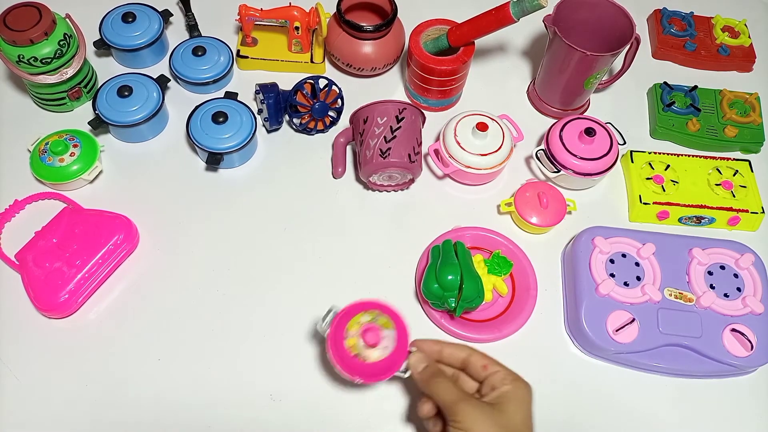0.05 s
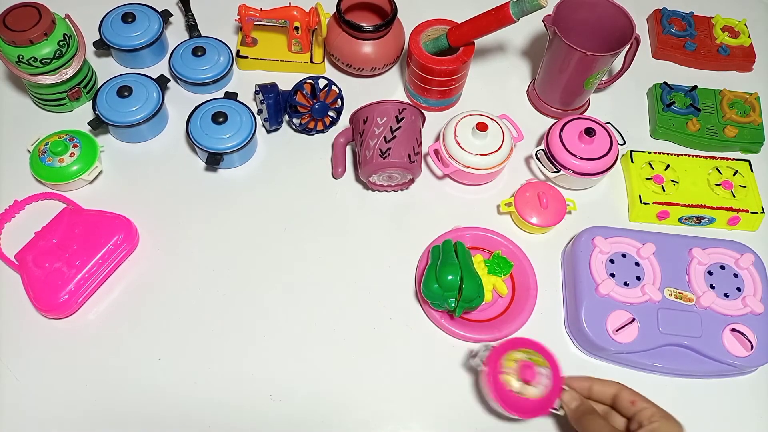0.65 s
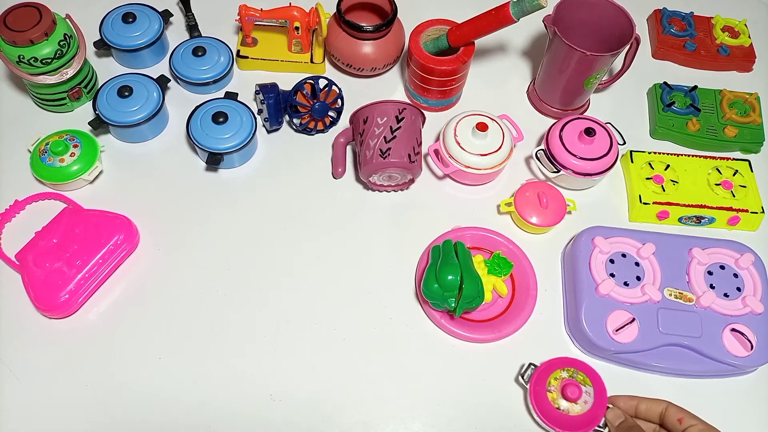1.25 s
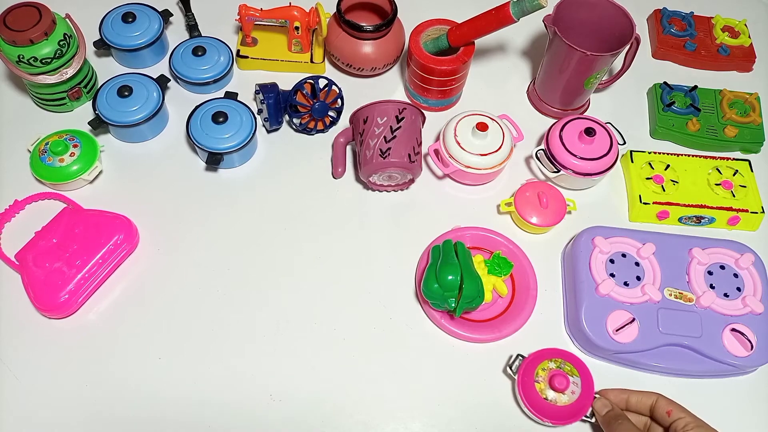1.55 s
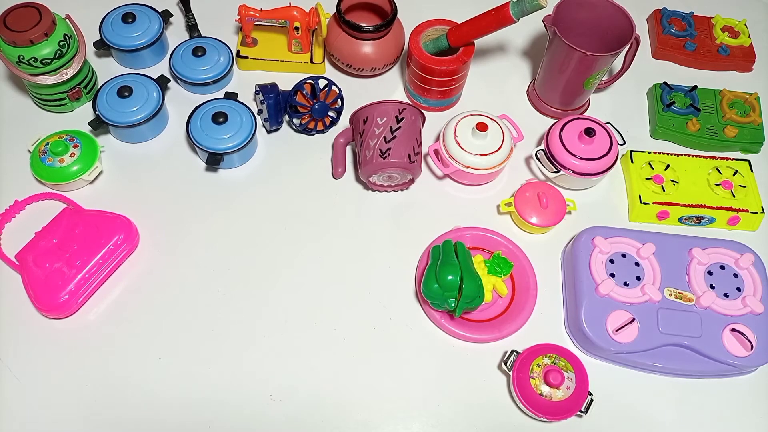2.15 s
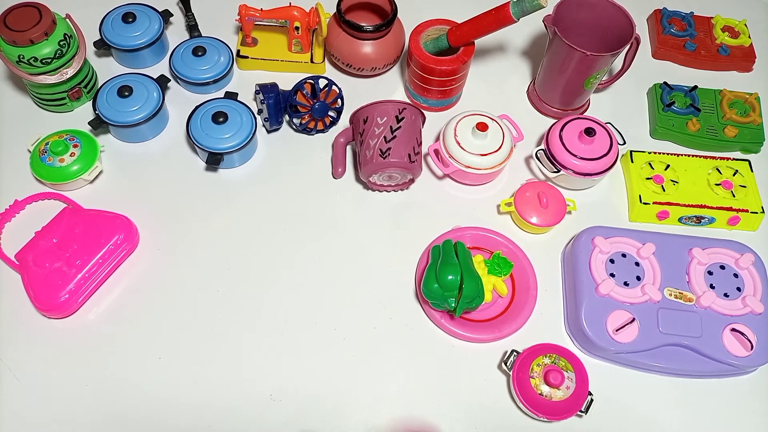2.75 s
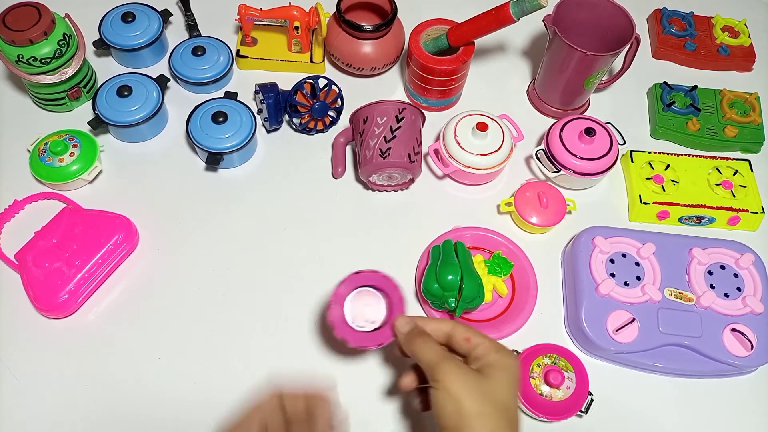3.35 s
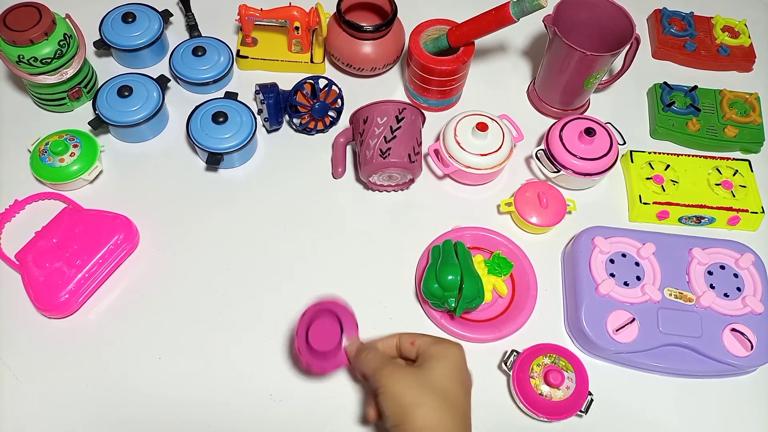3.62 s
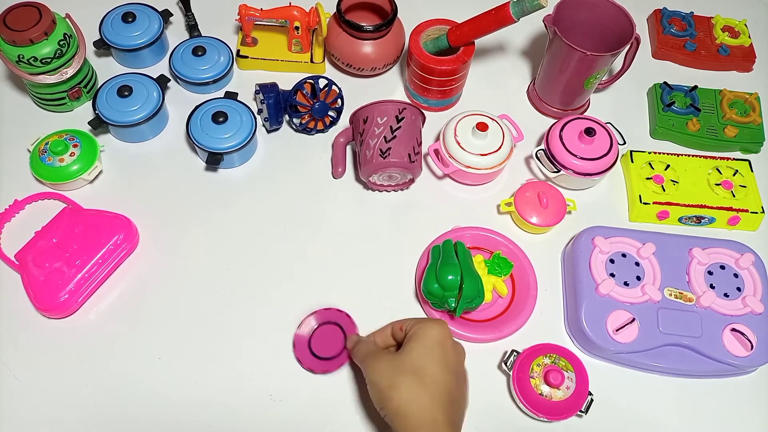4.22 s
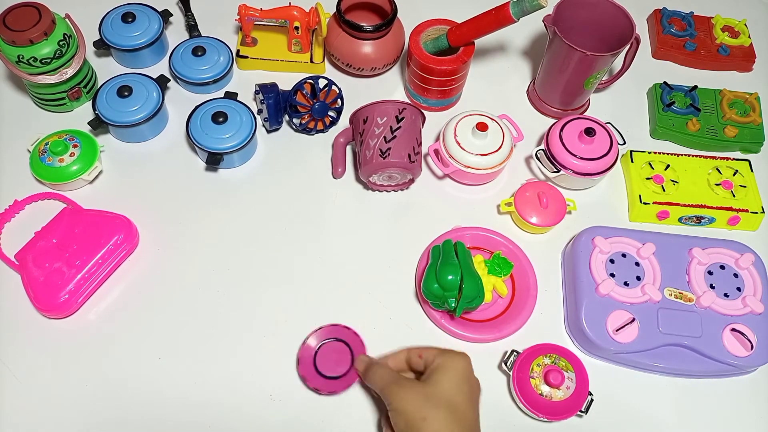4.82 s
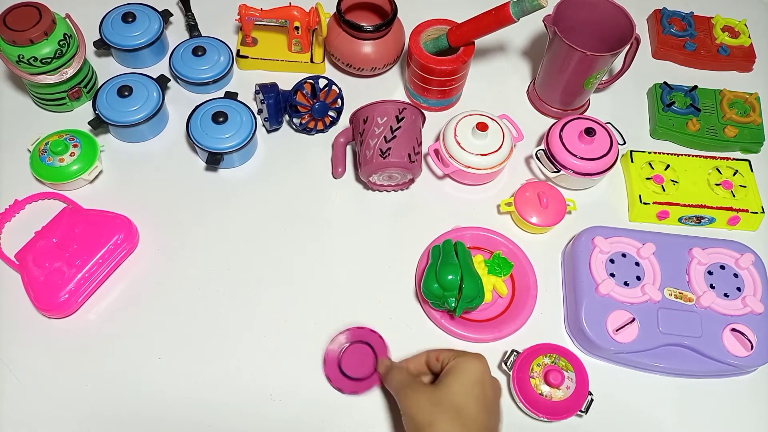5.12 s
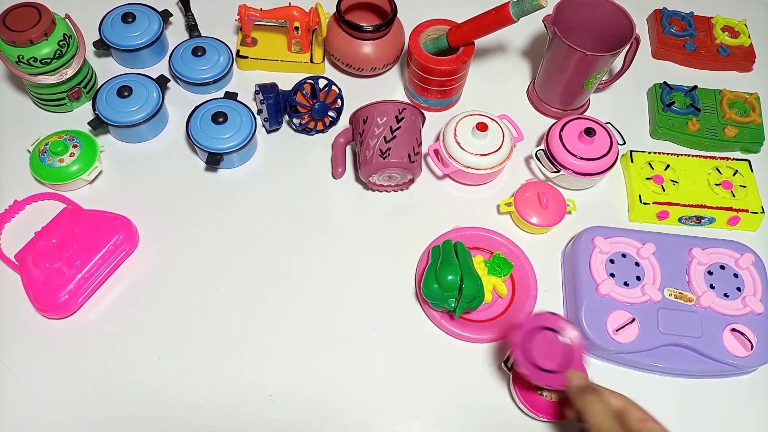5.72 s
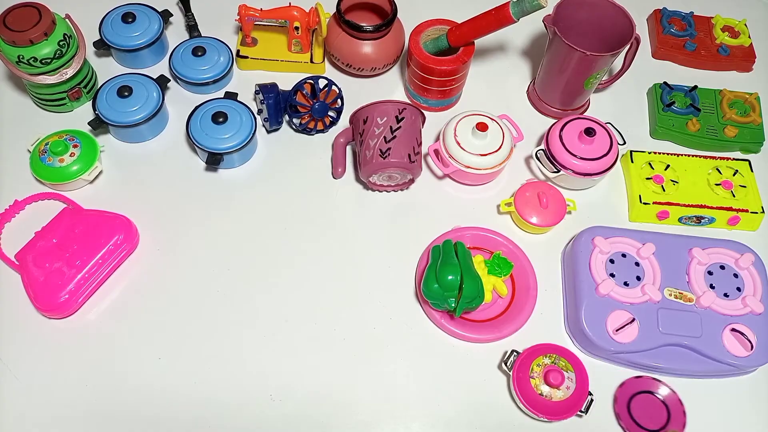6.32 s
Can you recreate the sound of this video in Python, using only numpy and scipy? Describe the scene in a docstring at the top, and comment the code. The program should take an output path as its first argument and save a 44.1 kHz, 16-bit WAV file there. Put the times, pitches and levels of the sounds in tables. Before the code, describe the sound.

Close, sharp plastic taps sound on a table in a small, slightly echoing room. First a toy pot bounces along for about a second, its lid jolting. A gap follows with a very faint squeak, then a small toy dish lands again and again in a longer, uneven series, with light rim ticks at the end. Moving air bumps the nearby microphone with low rumbling puffs all along, above a soft hiss.

```python
"""A lidded toy pot hops across a tabletop in a small hard room; later a small plastic dish does the same.
Each tap is a sharp tick with short shell resonances; a limiter holds it down and lets the room swell
after it. The pot skids once on its rim; plastic squeaks faintly and the dish's rim ticks lightly.
Throughout, a draught buffets the nearby microphone in dull gusts and puffs, over a faint hiss."""
import sys
import numpy as np
from scipy import signal
from scipy.fft import rfft, irfft
from scipy.io import wavfile
from scipy.ndimage import uniform_filter1d, minimum_filter1d

SR = 44100
rng = np.random.default_rng(int(sys.argv[2]) if len(sys.argv) > 2 else 0)


def generate_wav(sig):
    """Save sig (samples, or channels by samples) to the path in sys.argv[1] as 16-bit PCM at SR."""
    pcm = np.round(np.clip(np.atleast_2d(sig).T, -1, 1) * 32767).astype(np.int16)
    wavfile.write(sys.argv[1], SR, pcm)


N = 285321


def amp(db):
    """Amplitude ratio from dB."""
    return 10 ** (np.asarray(db) / 20)


def unit_rms(x):
    """Scales to rms 1."""
    return x / np.sqrt(np.mean(x ** 2) + 1e-20)


def log_interp(points, hz):
    """Joins (f/Hz, value) points on a log-frequency axis."""
    f, value = np.transpose(points)
    return np.interp(np.log(hz + 1), np.log(f + 1), value)


def add(mix, start_s, sound):
    """Mixes a sound in; it may begin before zero."""
    start = round(start_s * SR)
    sound = sound[max(-start, 0):]
    part = mix[max(start, 0):][:len(sound)]
    part += sound[:len(part)]


def bells_db(modes, hz):
    """Bell-shaped peak or dip around each mode."""
    return sum(db / (1 + (2 * (hz - f) / width) ** 2) for f, width, db in modes)


def noise(colour):
    """Noise of rms 1 with the given spectrum."""
    gain = amp(log_interp(colour, np.fft.rfftfreq(N, 1 / SR)))
    return unit_rms(irfft(rfft(rng.standard_normal(N)) * gain, N))


def min_phase(db):
    """Minimum-phase impulse response of a spectrum."""
    log_gain = np.log(amp(np.r_[db, db[-2:0:-1]]))
    return np.fft.ifft(np.exp(np.conj(signal.hilbert(log_gain)))).real[:len(db)]


def shell_blow(colour, modes, tilt_db_oct, knock_db=0, size=4096):
    """One blow on a shell; each contact point weights the resonances differently."""
    hz = np.fft.rfftfreq(size, 1 / SR)
    contact = np.transpose([np.geomspace(600, 16000, 70), 1.3 * np.r_[0, rng.standard_normal(69)]])
    shell_db = np.maximum(log_interp(colour, hz), -70) + bells_db(modes, hz)
    tilt_db = tilt_db_oct * np.log2(np.clip(hz, 200, 7000) / 1500)
    table_db = bells_db([(459, 470, knock_db)], hz)  # a flat landing also knocks the tabletop
    blow = min_phase(shell_db + tilt_db + table_db + log_interp(contact, hz))
    return blow / abs(min_phase(shell_db)).max()


def ringing(modes, grip_detune=0.0121, size=16384):
    """Slowly dying modes, energy 1; each blow shares its force differently and the grip bends the pitch."""
    hz, db, t60_s = np.transpose(modes)[:, :, None]
    t = np.arange(size) / SR
    share, bend = rng.standard_normal((2,) + hz.shape)
    envelopes = amp(db + 3 * share - 60 * t / t60_s)
    tones = (envelopes * np.sin(2 * np.pi * hz * (1 + grip_detune * bend) * t)).sum(0)
    return tones / np.linalg.norm(tones)


# room decay: f/Hz, T60/s
ROOM_T60 = [(300, 0.25), (800, 0.39), (2100, 0.36), (5500, 0.37), (14600, 0.39)]
# standing waves: f/Hz, width/Hz, gain/dB
ROOM_MODES = [(468.4, 42, 8), (573, 8.7, -3.5), (723, 5.7, 2), (759, 15, -2), (904.6, 125, 7.5),
              (1394, 45, 8.5), (1740, 20, -3.5), (1957, 154, 6.5), (3170, 29, -0.5), (3140, 35, 9),
              (3390, 130, 1), (4730, 40, -43)]
def room_tail(build_s=0.0044, hold_s=0.11, steepness=3, floor_db=-17, size=16384):
    """Dense room reflections, energy 1; noise suppression cuts them to a faint tail after about 0.1 s."""
    hz, frame_s, spectra = signal.stft(rng.standard_normal(size), SR, nperseg=256)
    decay = amp(-60 * frame_s / log_interp(ROOM_T60, hz)[:, None])
    tail = signal.istft(spectra * decay, SR, nperseg=256)[1]
    t = np.arange(len(tail)) / SR
    build = 1 - np.exp(-(t / build_s) ** 2)
    suppression = np.maximum(np.exp(-(t / hold_s) ** steepness), amp(floor_db))
    standing_waves = min_phase(bells_db(ROOM_MODES, np.fft.rfftfreq(size, 1 / SR)))
    tail = signal.fftconvolve(tail * build * suppression, standing_waves)[:size]
    return tail / np.linalg.norm(tail)


def clutter(level_db=-7, size=200):
    """Close reflections off toys standing around make each tap hollow in its own way."""
    scatter = rng.standard_normal(size) * signal.windows.tukey(size, .5)
    return amp(level_db) * scatter / np.linalg.norm(scatter)


# first echoes off table and walls: delay/s, level/dB
ECHOES = [(.0017, -8.5), (.0032, -11.5), (.0117, -15.5), (.0148, -25), (0.025, -22), (0.034, -27.5)]
def in_room(sound, room_db, echo_db, echo_cutoff_hz=4000):
    """Direct sound, close scatter, duller echoes and a tail that differs at each place on the table."""
    path = amp(room_db) * room_tail()
    echoes = np.zeros(SR // 20)
    for delay_s, db in ECHOES:
        echoes[round(delay_s * SR)] += amp(db + echo_db)
    add(path, 0, signal.lfilter(*signal.butter(1, echo_cutoff_hz, fs=SR), echoes))
    add(path, 0, clutter())
    path[0] += 1  # direct sound
    return signal.fftconvolve(sound, path)


def taps(rows, colour, modes, long_modes, ring_db, echo_db, accent_width_hz=600):
    """A toy knocks on the table; where it lands favours or damps one resonance, the accent."""
    out = np.zeros(N)
    for start_s, db, tilt_db_oct, knock_db, accent_hz, accent_db, room_db in rows:
        accent = (accent_hz, accent_width_hz, accent_db)
        blow = amp(db) * shell_blow(colour, [*modes, accent], tilt_db_oct, knock_db)
        add(out, start_s, in_room(blow, room_db, echo_db))
        add(out, start_s, amp(ring_db) * np.linalg.norm(blow) * ringing(long_modes))
    return out


# taps and lid jolts: t/s, level/dB, tilt/(dB/oct), knock/dB, accent f/Hz, accent gain/dB, room/dB
POT_TAPS = [(-.022, 0.5, 2, 7.5, 1210, 3, -6.5), (.0770, 3, 0.9, 4.5, 4600, 5, -6.5),
            (.3405, -7.5, -8, -30, 1170, -5, 3), (.5211, 3, 2.5, 11.5, 1490, 1.5, -6),
            (.5630, -10.5, -6.5, -13.5, 2430, 5, -2), (.7206, 3, 0.8, 6, 2130, -0.5, -9),
            (.8619, 6.5, 2, 12, 6330, 5.5, -7.5), (.8878, -6.5, 1, 14, 1140, 2, -7),
            (1.1776, 3.5, 2, 11.5, 3900, 3, -5.5), (1.1830, -11, -4, 6.5, 570, -12, 3.5)]
# broad tap spectrum: f/Hz, density/dB
POT_COLOUR = [(120, -67), (200, -6), (394, -2.5), (456, -3.5), (763, 1), (836, 0), (1140, 5), (1370, -9),
              (1560, -3.5), (2800, -10.5), (3760, -11.5), (8270, -42), (14900, -54.5), (16000, -30.5)]
# shell resonances: f/Hz, width/Hz, gain/dB
POT_MODES = [(357, 52, 4), (433, 31, 3), (564, 93, 4), (745, 56, 7.5), (1147, 56, 3), (1530, 230, 5.5),
             (2460, 590, 4.5), (3710, 190, 4.5), (4370, 180, 6), (6610, 1500, 8), (8800, 1500, -8)]
# faint long modes: f/Hz, level/dB, T60/s
POT_RING = [(436, 7, 0.3), (757, 1.5, 0.25), (918, 5, 0.39), (1064, 2.5, 0.34), (1470, -2, 0.33),
            (2230, -3, 0.33), (4730, -12.5, 0.24)]
def pot():
    """The pot lands and its lid jolts, ringing the shell."""
    return taps(POT_TAPS, POT_COLOUR, POT_MODES, POT_RING, ring_db=-16.5, echo_db=3)


def turbulence(colour, window=1100):
    """Low rumble of air, its strength evened out from moment to moment."""
    air = noise(colour)
    return air / np.sqrt(uniform_filter1d(air ** 2, window) + 0.11)


# gusts across the microphone: t/s, length/s, level/dB
GUSTS = [(0.0, 0.2, -33), (0.218, 0.19, -39), (0.643, .19, -31.5), (0.939, 0.21, -44.5),
         (1.255, 0.15, -31.5), (1.514, .04, -44), (1.678, 0.024, -36.5), (2.055, 0.25, -36.5),
         (2.293, 0.033, -20.5), (2.366, 0.031, -27), (2.47, 0.084, -29.5), (2.681, 0.16, -28),
         (2.914, 0.068, -37), (3.181, .12, -36), (3.44, 0.16, -41.5), (3.603, 0.043, -27),
         (3.8, 0.071, -33), (4.144, .028, -37.5), (4.382, 0.17, -37.5), (5.71, 0.093, -35.5),
         (5.94, 0.23, -40), (6.009, 0.03, -27.5), (6.149, 0.1, -24), (6.371, 0.026, -36)]
# slow eddies: f/Hz, density/dB
SLOW_AIR_COLOUR = [(15, -46.5), (25, -32.5), (65, 11), (123, 4), (188, -10.5), (271, -14), (362, -40),
                   (450, -22.5), (580, -61.5), (990, -120)]
# fast eddies: f/Hz, density/dB
FAST_AIR_COLOUR = [(25, -25.5), (80, 2), (190, 1.5), (290, -7.5), (400, -32), (600, -84.5)]
def draught(rise_s=.024, fall_tau_s=0.0091, wake_db=-21, wake_tau_s=.07, fast_db=-27.5, spread_db=2.5):
    """Each gust rises, holds and dies into a faint wake; faster air makes smaller, brighter eddies."""
    strength, t = np.zeros(N), np.arange(SR) / SR
    for start_s, length_s, db in GUSTS:
        after_s = np.maximum(t - length_s, 0)
        fall = np.maximum(np.exp(-after_s / fall_tau_s), amp(wake_db) * np.exp(-after_s / wake_tau_s))
        add(strength, start_s, amp(db) * np.minimum(t / rise_s, 1) * fall)
    strength_db = 20 * np.log10(strength + 1e-9)
    fast_share = .5 + .5 * np.tanh((strength_db - fast_db) / (2 * spread_db))
    slow_air = np.sqrt(1 - fast_share) * turbulence(SLOW_AIR_COLOUR)
    fast_air = np.sqrt(fast_share) * turbulence(FAST_AIR_COLOUR)
    return strength * (slow_air + fast_air)


# background spectrum: f/Hz, density/dB
HISS_COLOUR = [(35, -31.5), (60, 4.5), (118, 8), (146, -11.5), (338, -6), (448, -7.5), (682, -12),
               (842, -5.5), (1140, -13), (1250, -7.5), (2090, -12.5), (2900, -14.5), (3120, -14),
               (8120, -45.5), (16000, -55.5)]
def hiss(level_db=-55):
    """Faint, steady noise."""
    return amp(level_db) * noise(HISS_COLOUR)


# single strong eddies: t/s, level/dB, f/Hz
PUFFS = [(0.277, -18, 94), (0.634, -18.5, 89), (.689, -10.5, 165), (.741, -16, 150), (0.771, -11, 123),
         (1.294, -11, 148), (2.204, -12.5, 147), (2.529, -15.5, 109), (2.838, -20.5, 117),
         (3.239, -15.5, 151), (3.521, -23.5, 157), (3.623, -14.5, 152.5), (3.805, -9.5, 143),
         (4.018, -20, 88.6), (4.486, -21, 167), (5.727, -16.5, 106), (5.76, -19, 109), (6.163, -15.5, 93),
         (6.229, -11, 115)]
def puffs(sigma_cycles=0.36):
    """Each eddy pushes and pulls the diaphragm for a cycle or two; big, slow ones last longer."""
    out, t = np.zeros(N), np.arange(-2048, 2048) / SR
    for (centre_s, db, hz), phase in zip(PUFFS, rng.random(len(PUFFS))):
        envelope = amp(db) * np.exp(-(hz * t / sigma_cycles) ** 2 / 2)
        add(out, centre_s + t[0], envelope * np.cos(2 * np.pi * (hz * t + phase)))
    return out


# skid envelope: t/s, level/dB
SKID = [(.309, -64), (.318, -16.5), (.341, -41), (.350, -24), (.372, -49)]
def skid(slips_per_s=1500, tilt_db_oct=-2.9):
    """Many tiny slips of the rim ring the pot."""
    t = np.arange(N) / SR
    times_s, levels_db = np.transpose(SKID)
    sliding = (t > times_s[0]) & (t < times_s[-1])
    envelope = amp(np.interp(t, times_s, levels_db)) * sliding
    slips = rng.standard_normal(N) * (rng.random(N) < slips_per_s / SR)
    scrape = unit_rms(signal.oaconvolve(slips, shell_blow(POT_COLOUR, POT_MODES, tilt_db_oct))[:N])
    return in_room(scrape * envelope, room_db=-0.5, echo_db=-29)[:N]


# rubbing spectrum: f/Hz, density/dB
SQUEAK_COLOUR = [(2500, -20), (3900, -11), (4500, -1), (5100, -20), (5850, 2), (6700, -15), (9000, -31),
                 (15000, -48)]
def squeak(start_s=2.696, length_s=.034, level_db=-57):
    """Plastic rubs briefly against plastic."""
    out = np.zeros(N)
    rub = noise(SQUEAK_COLOUR)[:round(length_s * SR)]
    add(out, start_s, amp(level_db) * rub * np.hanning(len(rub)))
    return out


# rim touches: t/s, level/dB, accent f/Hz, accent gain/dB, tilt/(dB/oct)
RIM_TICKS = [(3.6367, -13.5, 4600, 11, 0), (6.3725, -19.5, 3750, 21, -3.5), (6.390, -25, 2490, 11, -5.5)]
# rim resonances: f/Hz, width/Hz, gain/dB
RIM_MODES = [(764, 225, 17.5), (1200, 790, -3.5), (1830, 130, 11.5), (2740, 400, 5.5), (4000, 500, -2)]
# broad spectrum of dish ticks and taps: f/Hz, density/dB
DISH_COLOUR = [(150, -18.5), (250, -59), (296, -7.5), (436, 0), (600, -7.5), (664, -5), (1160, 1),
               (1470, 1.5), (1920, -1.5), (2090, 3), (4380, -0.5), (5540, -12), (7020, -15.5), (8170, -33),
               (14000, -27.5)]
def rim_ticks(accent_width_hz=600):
    """Light touches ring mainly one high resonance of the dish's rim."""
    out = np.zeros(N)
    for start_s, db, accent_hz, accent_db, tilt_db_oct in RIM_TICKS:
        accent = (accent_hz, accent_width_hz, accent_db)
        tick = shell_blow(DISH_COLOUR, [*RIM_MODES, accent], tilt_db_oct)
        add(out, start_s, amp(db) * in_room(tick, room_db=-10.5, echo_db=2))
    return out


# dish taps: t/s, level/dB, tilt/(dB/oct), knock/dB, accent f/Hz, accent gain/dB, room/dB
DISH_TAPS = [(3.8249, 2, 0.62, 0.5, 3380, -12.5, -8.5), (3.9741, -2, -1.3, -6, 4140, -2, -2),
             (4.1278, -4.5, -0.65, -6.5, 2580, 0, -2.5), (4.3657, 4.5, -1.1, -6, 2800, 3.5, -4.5),
             (4.5788, 6, 1, 0, 3650, 2.5, -4), (4.7765, -10, 1, -3, 1620, 3.5, 2.5),
             (4.9272, -4.5, 0.89, -4.5, 3850, -0.5, 0.5), (5.0352, -4.5, 0.13, -3, 4500, 5, -6),
             (5.2563, -0.5, -0.45, -1, 2300, 4, -3), (5.4732, -1.5, 0.9, 2.5, 4910, 6.5, -5)]
# shell resonances: f/Hz, width/Hz, gain/dB
DISH_MODES = [(416, 150, 6.7), (660, 134, 5.9), (786, 52, 10.6), (1179, 112, 8.6), (1650, 50, 2.1),
              (1798, 300, 5.8), (2280, 140, 2.4), (2663, 290, 3.04), (2930, 81, 3.9), (3470, 210, 4.2),
              (3840, 100, 3.9), (4800, 400, 3.5), (7300, 530, 1.5)]
# faint long modes: f/Hz, level/dB, T60/s
DISH_RING = [(1106, 8, 0.16), (1530, 5, 0.15), (1996, -1, 0.22), (2310, -1, 0.24), (2870, -1, 0.26),
             (3250, -3, 0.22), (3760, -5, 0.2), (4400, -9, .18), (4990, -13, .18), (5620, -14, .18),
             (6400, -15, 0.22)]
def dish():
    """Each landing rings the dish's plastic shell."""
    return taps(DISH_TAPS, DISH_COLOUR, DISH_MODES, DISH_RING, ring_db=-10.5, echo_db=0)


def scene():
    """Toys, moving air and hiss at one microphone."""
    toys = pot() + skid() + dish() + rim_ticks() + squeak()
    return (toys + puffs() + draught() + hiss())[None]


def limiter(x, ceiling_db=-1.9, release_db_per_s=130, window=45):
    """Pulls the gain down just ahead of each peak and lets it recover slowly."""
    over_db = np.maximum(20 * np.log10(abs(x) + 1e-9) - ceiling_db, 0)
    held_db = -minimum_filter1d(-over_db, window)
    release_db = np.arange(N) * release_db_per_s / SR
    reduction_db = np.maximum.accumulate(held_db + release_db) - release_db
    return x / amp(uniform_filter1d(reduction_db, window))


# microphone port resonance: f/Hz, width/Hz, gain/dB
MIC_PORT = [(14850, 900, 16)]
def record(dry, low_hz=30, clip_db=-3, high_hz=15550):
    """Microphone resonance and bass roll-off, limiter, clipping, band limit."""
    port = min_phase(bells_db(MIC_PORT, np.fft.rfftfreq(1024, 1 / SR)))
    highpass = signal.butter(2, low_hz, "high", fs=SR, output="sos")
    voltage = signal.sosfilt(highpass, signal.oaconvolve(dry[0], port)[:N])
    clipped = np.clip(limiter(voltage), -amp(clip_db), amp(clip_db))
    lowpass = signal.firwin(301, high_hz, window=("kaiser", 8), fs=SR)
    return signal.oaconvolve(clipped, lowpass, "same")[None]


dry = scene()
out = record(dry)
generate_wav(out)
```